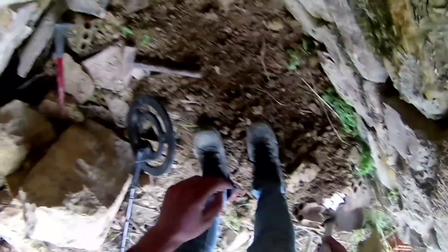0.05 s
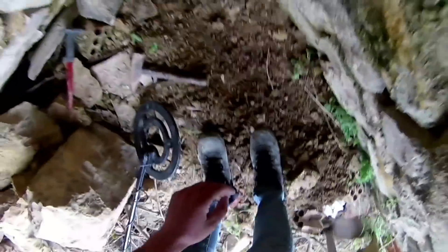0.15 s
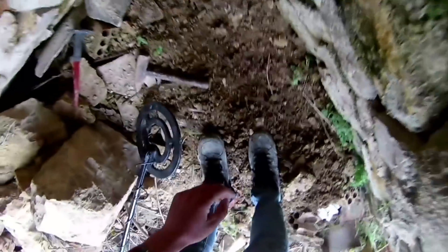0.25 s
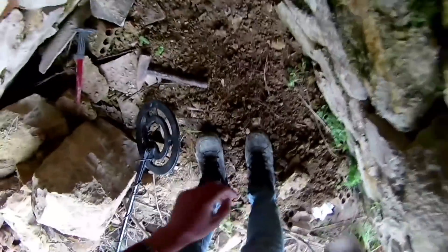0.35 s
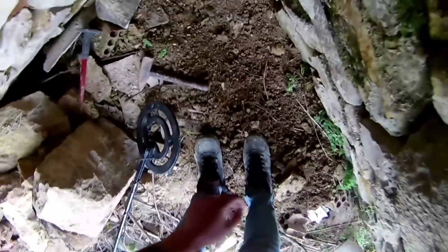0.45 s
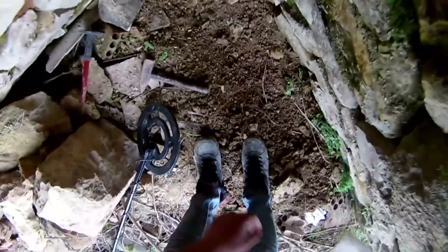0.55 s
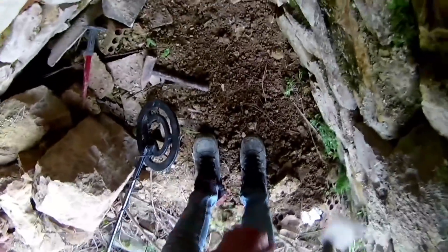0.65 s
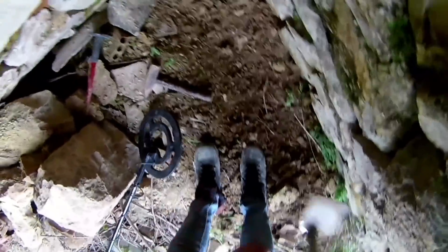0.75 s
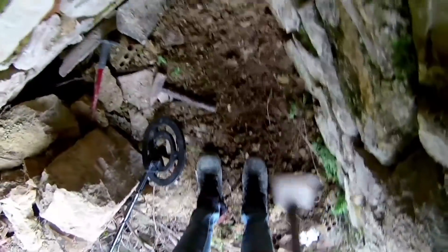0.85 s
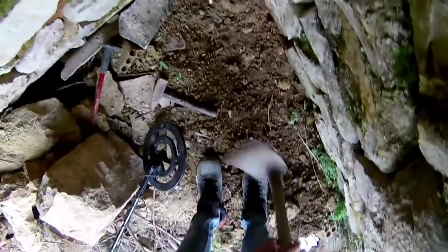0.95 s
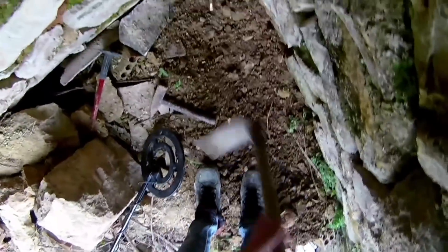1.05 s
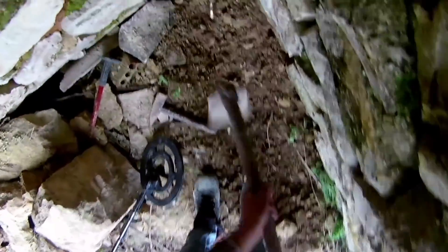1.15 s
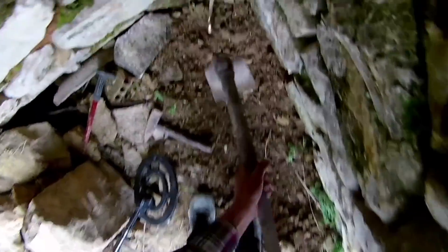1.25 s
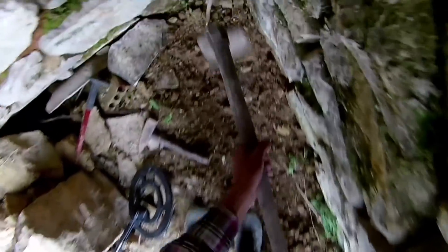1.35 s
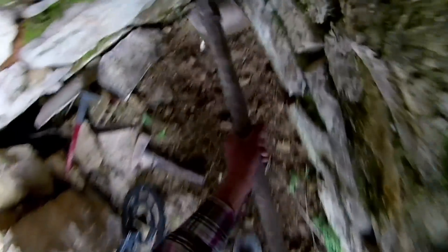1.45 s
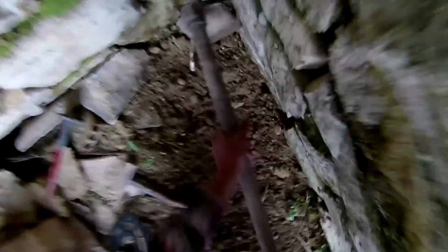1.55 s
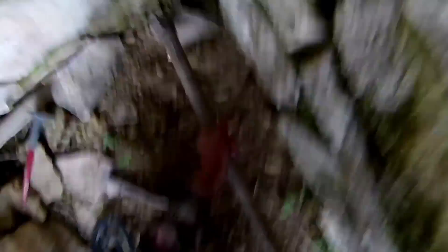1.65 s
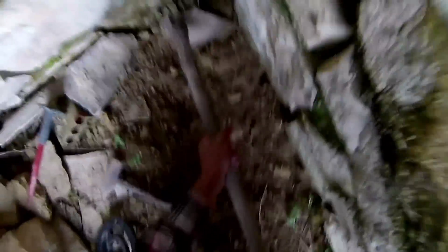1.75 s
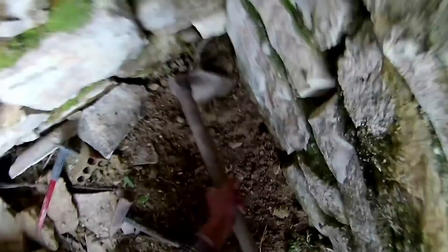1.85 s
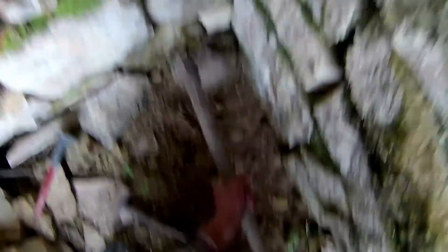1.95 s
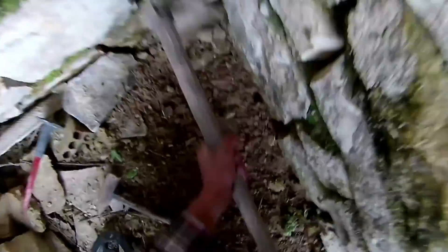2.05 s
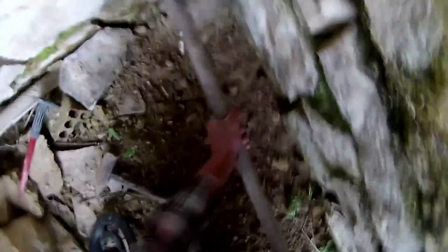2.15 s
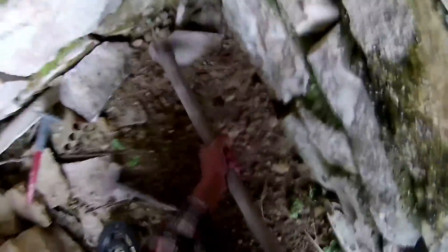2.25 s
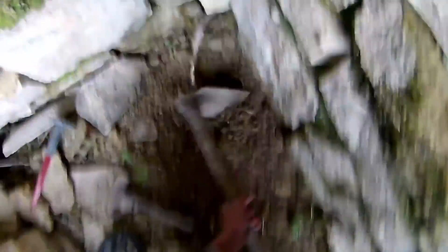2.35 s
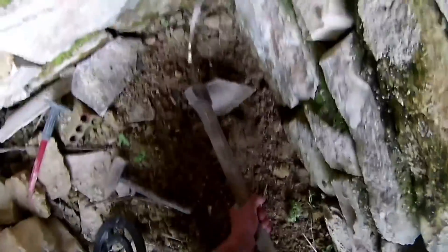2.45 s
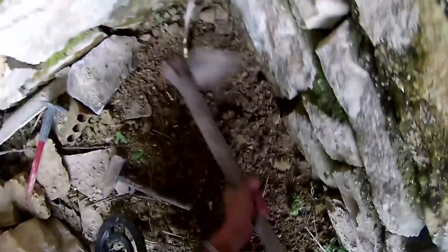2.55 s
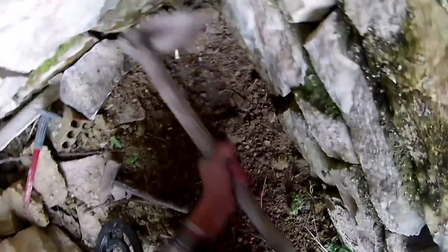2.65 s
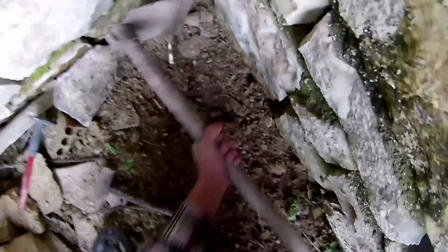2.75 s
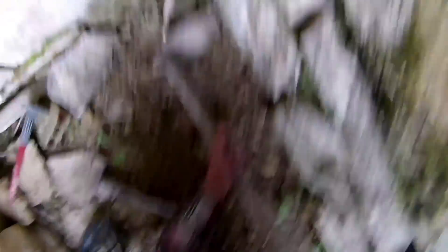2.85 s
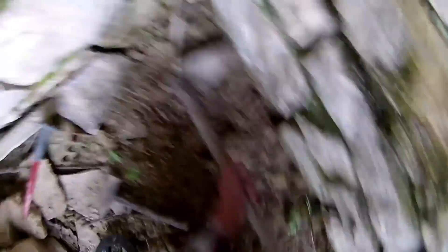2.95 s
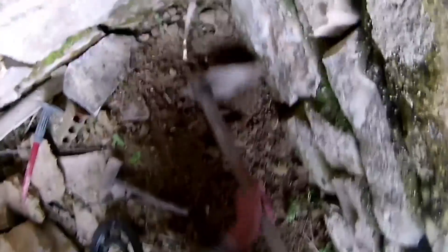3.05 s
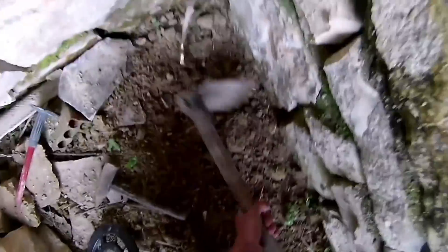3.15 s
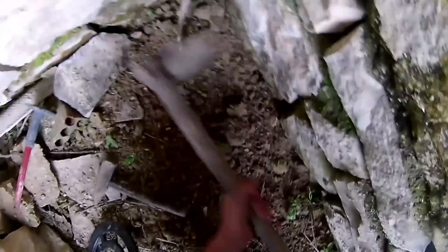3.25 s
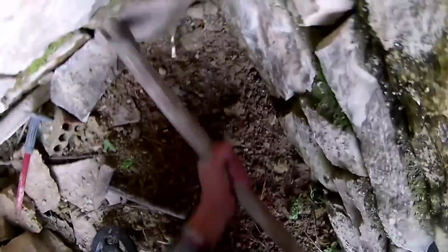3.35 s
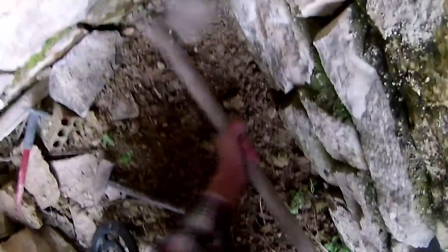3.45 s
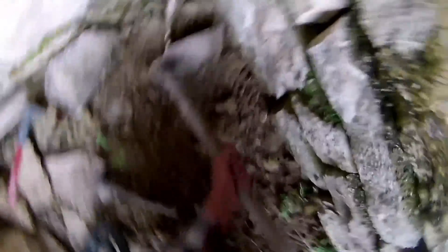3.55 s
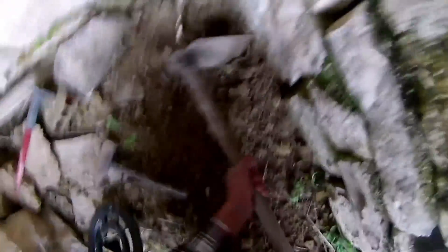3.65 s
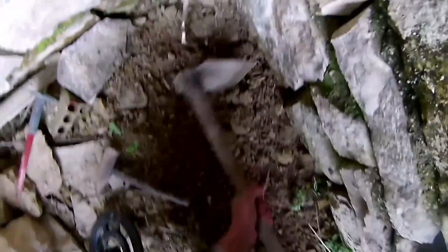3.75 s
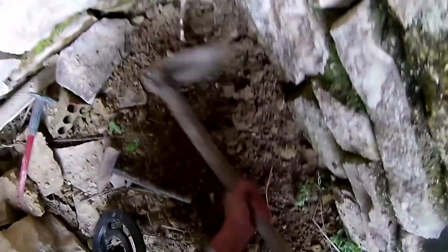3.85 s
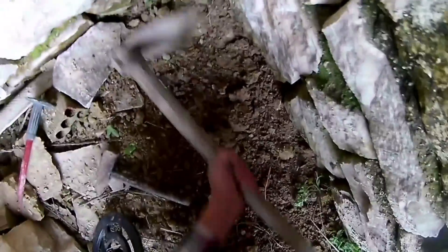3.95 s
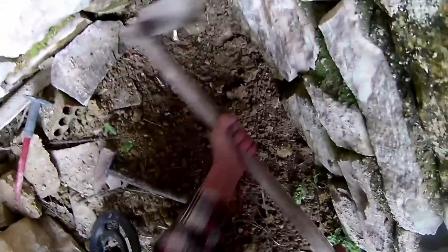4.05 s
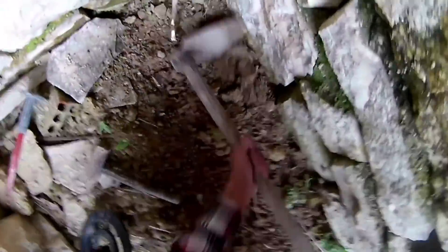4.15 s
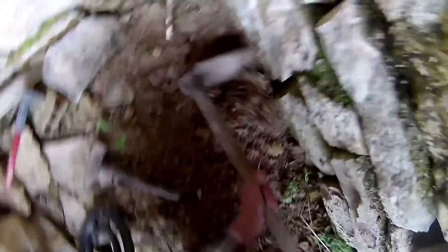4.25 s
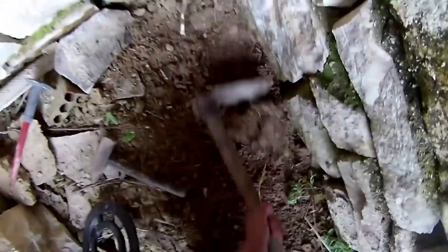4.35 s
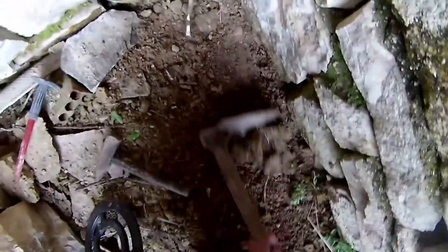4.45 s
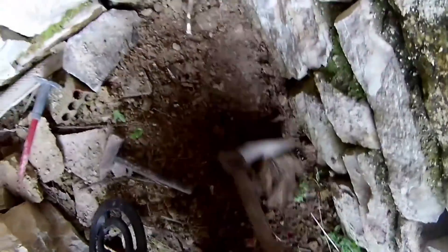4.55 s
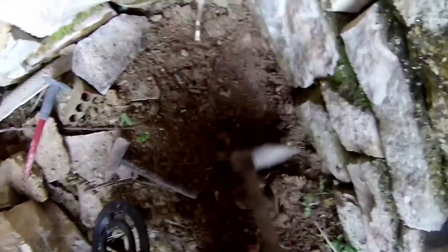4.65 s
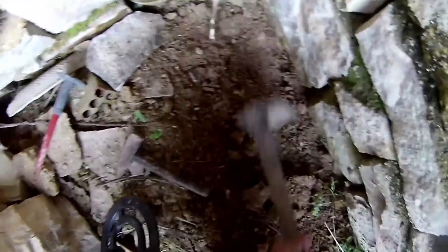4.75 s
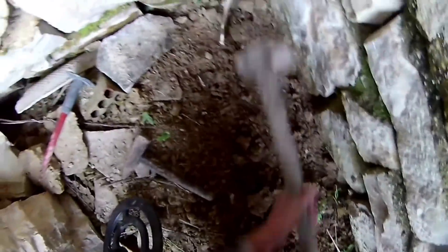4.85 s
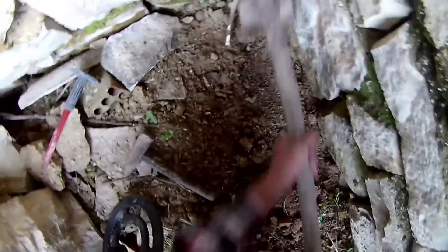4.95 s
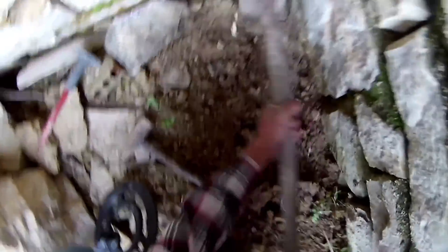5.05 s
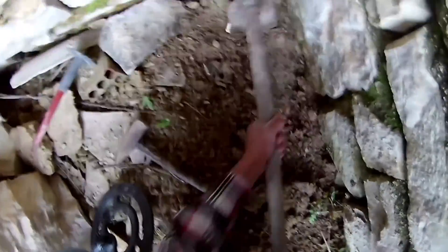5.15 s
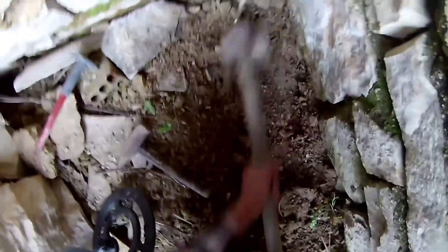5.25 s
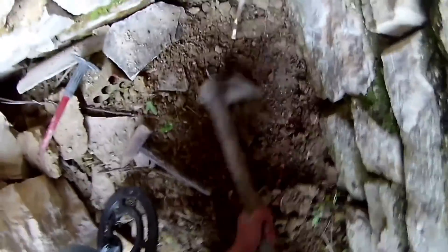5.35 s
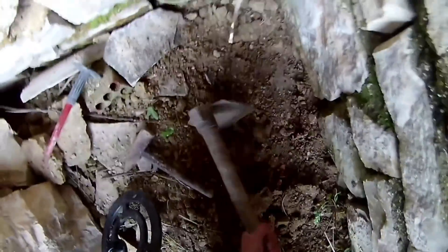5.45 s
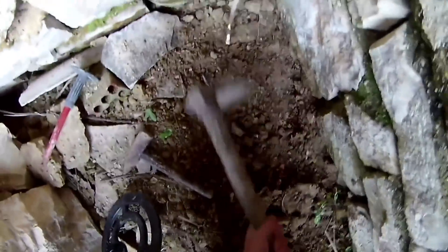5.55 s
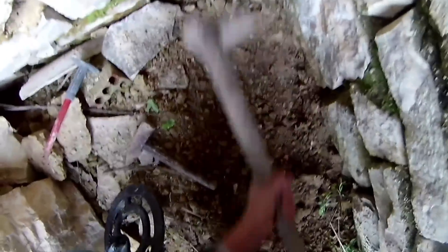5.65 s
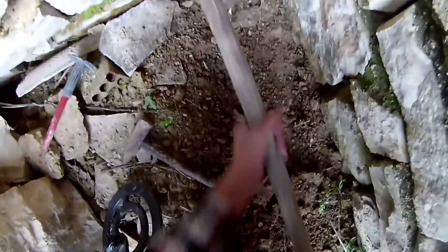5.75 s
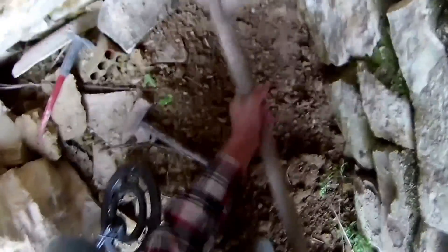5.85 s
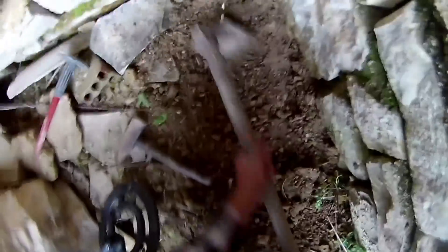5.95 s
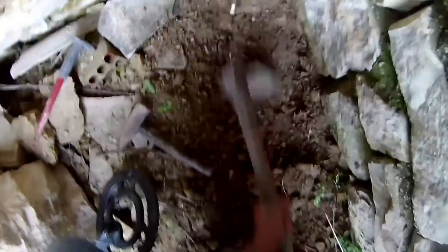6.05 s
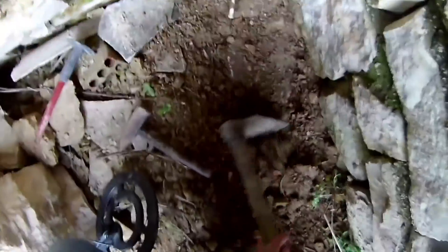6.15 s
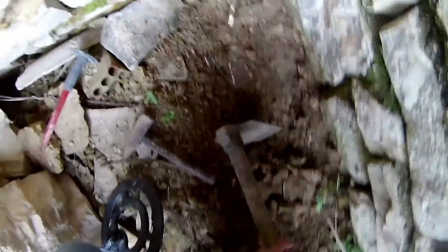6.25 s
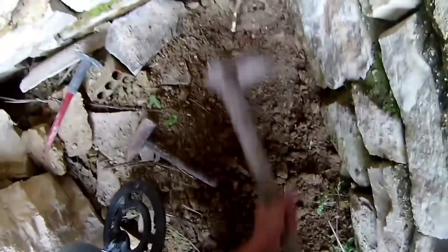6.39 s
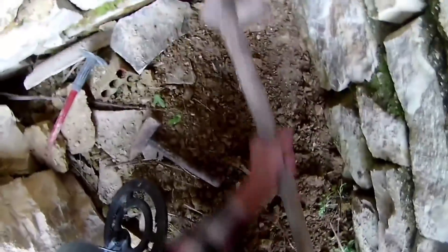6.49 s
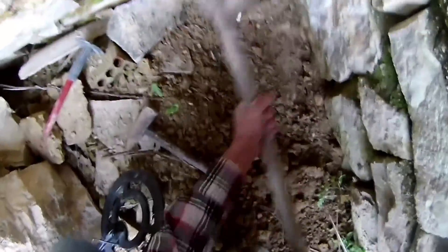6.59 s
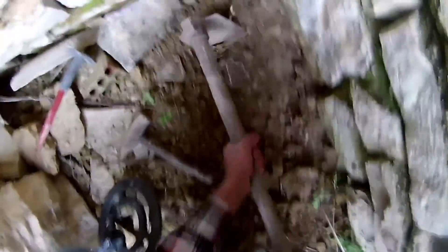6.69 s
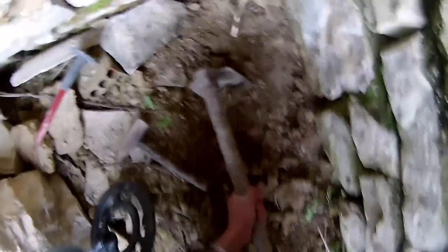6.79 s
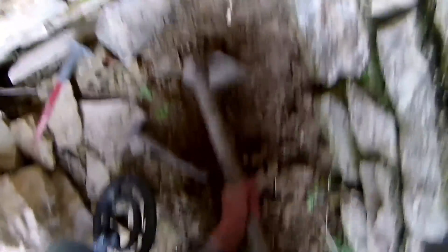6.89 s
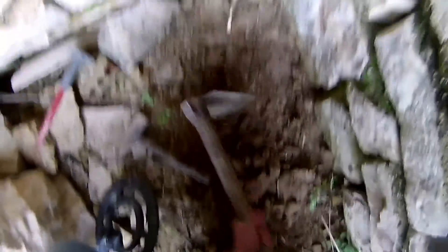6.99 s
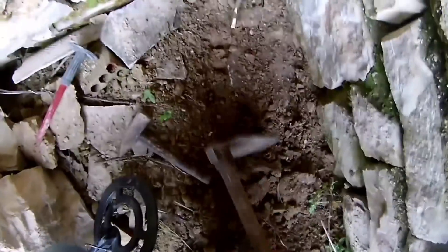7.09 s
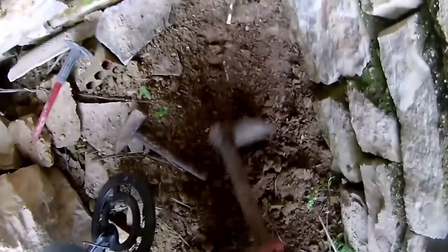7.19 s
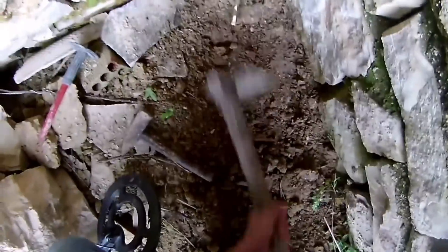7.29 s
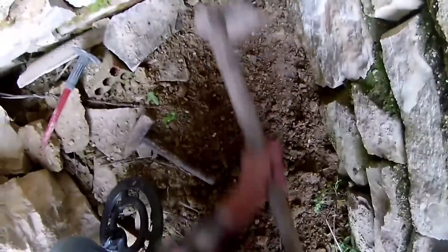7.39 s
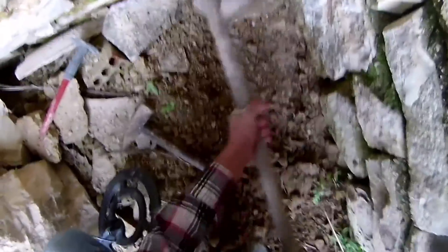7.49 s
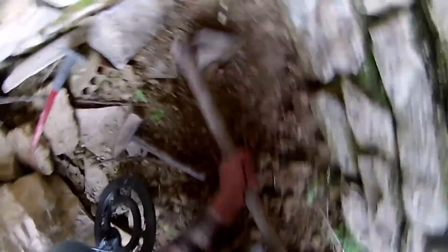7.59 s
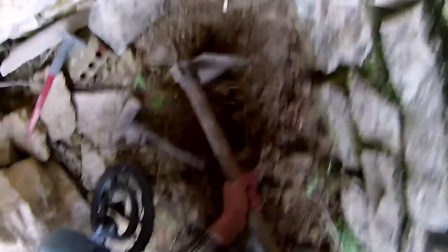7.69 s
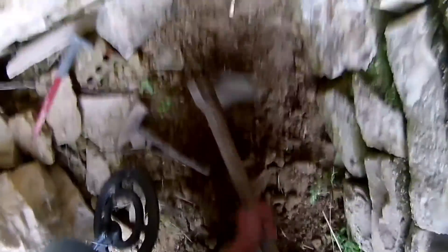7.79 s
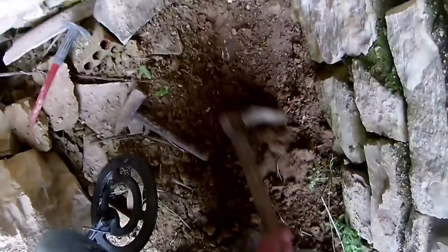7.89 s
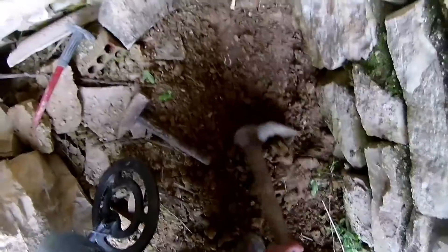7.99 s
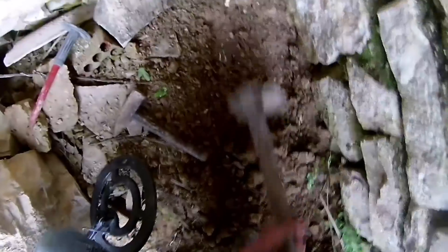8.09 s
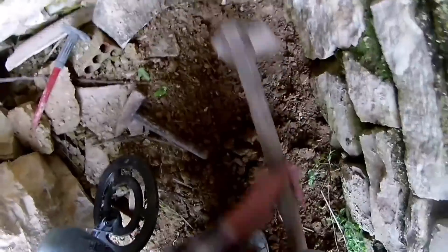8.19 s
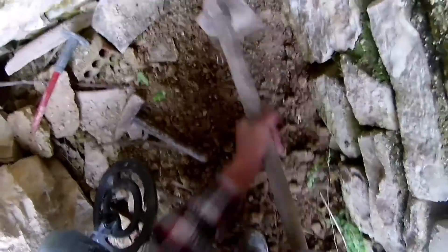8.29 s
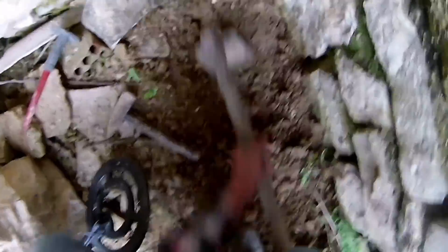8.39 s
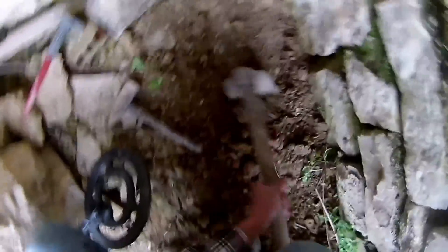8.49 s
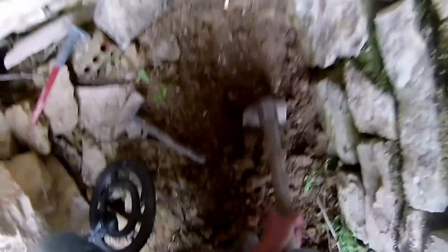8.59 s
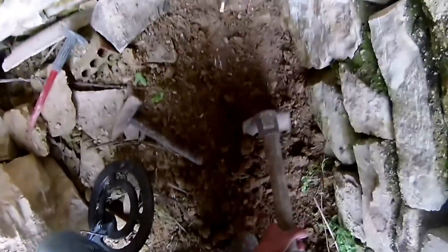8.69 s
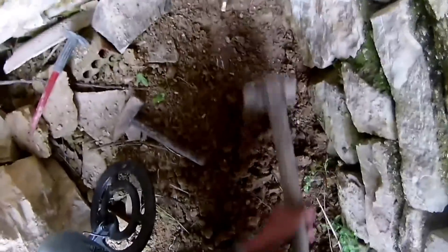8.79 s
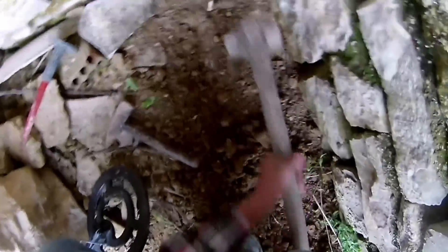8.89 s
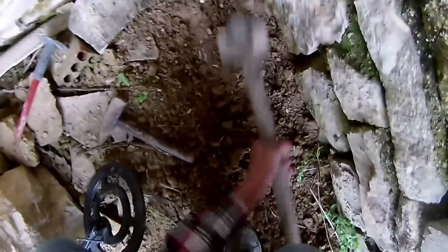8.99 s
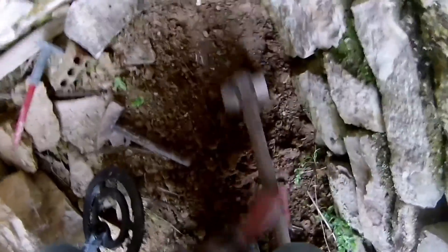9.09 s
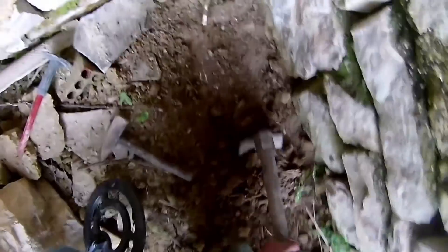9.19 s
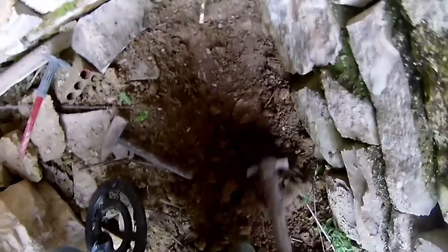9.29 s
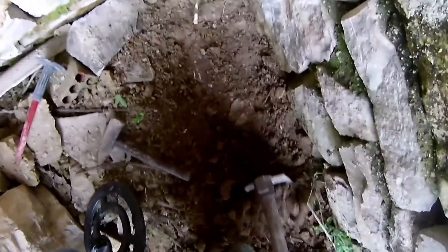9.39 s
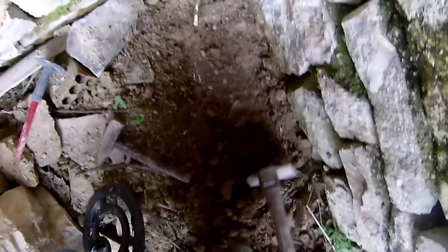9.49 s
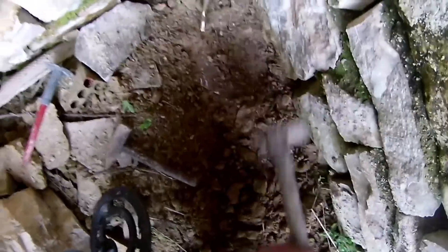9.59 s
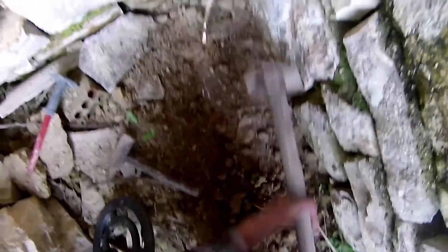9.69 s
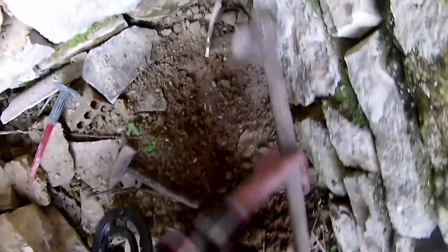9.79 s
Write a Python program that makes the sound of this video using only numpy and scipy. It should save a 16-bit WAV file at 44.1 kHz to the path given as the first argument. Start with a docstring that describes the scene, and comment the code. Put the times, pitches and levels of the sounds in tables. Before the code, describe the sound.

Faint handling ticks and a hollow knock lead into heavy, irregular digging. A steel pick cracks against buried stones and packed earth, sometimes in quick clusters of crunching impacts, then drags briefly through rubble while thrown soil drops back. Soft sleeve rub and quiet open air with thin hiss lie beneath. Nearby stones scatter a short, rough reflection; the close head-worn microphone overloads on the strongest blows.

```python
"""At the foot of a dry stone wall, a hand pick digs stony earth close to a small head-worn microphone.
Each blow is a crush of fractures clacking on stone, a handle knock, a ground thud, spat grit and ringing steel.
Between blows, bursts of breaking grains drag along the blade, and thrown soil and loose crumbs fall back.
One hollow knock comes early; quiet air, sleeve rub and hiss lie beneath, and the walls answer the digging.
The sound is nearly mono, and the hardest blows overload the microphone."""
import sys
import numpy as np
from scipy import signal
from scipy.io import wavfile
from scipy.ndimage import uniform_filter1d

SR = 44100
rng = np.random.default_rng(int(sys.argv[2]) if len(sys.argv) > 2 else 0)


def master_out(mix):
    """Clip the mix to full scale and print it as 16-bit PCM to the path in sys.argv[1]."""
    frames = np.transpose(np.atleast_2d(mix))
    ceiling = np.clip(frames, -1, 1)
    pcm = np.round(ceiling * 32767).astype(np.int16)
    wavfile.write(sys.argv[1], SR, pcm)


N = 433503  # length in samples
T = np.arange(SR // 3) / SR  # seconds since a contact


def amp(db):
    """Decibels to gain."""
    return 10 ** (np.asarray(db) / 20)


def evened(x):
    """Scales to rms 1."""
    return x / np.sqrt(np.mean(x ** 2) + 1e-20)


def sized(x):
    """Scales a short sound to the energy of 10 ms at rms 1."""
    return x / np.sqrt(np.sum(x ** 2) / (SR / 100) + 1e-20)


def read(points, hz):
    """Reads a table on a log-frequency axis."""
    table_hz, value = np.transpose(points)
    return np.interp(np.log(hz + 1), np.log(table_hz + 1), value)


def add(mix, s, sound):
    """Mixes a sound in at time s."""
    part = mix[max(round(s * SR), 0):][:len(sound)]
    part += sound[:len(part)]


def causal(points, size=2 * len(T)):
    """The minimum-phase impulse response of a spectrum: its energy comes as early as it can."""
    hz = abs(np.fft.fftfreq(size, 1 / SR))
    log_gain = np.log(amp(read(points, hz)))
    spectrum = np.exp(np.conj(signal.hilbert(log_gain)))
    return np.fft.ifft(spectrum).real[:size // 2]


def through(x, response):
    """Passes x through a body with this impulse response."""
    return signal.fftconvolve(x, response)[:len(x)]


def fading(t, t60):
    """Exponential decay that falls 60 dB in t60 seconds."""
    return np.exp(-np.log(1000) * t / t60)


def dying(t60, rise):
    """Envelope of a contact: a quick rise, then exponential decay."""
    return (1 - np.exp(-T / rise)) * fading(T, t60)


def mode(hz, t60, rise):
    """One dying vibration, scaled like any short sound."""
    return sized(dying(t60, rise) * np.sin(2 * np.pi * hz * T))


def crumbs(count, per_s, spread_db):
    """Tiny fractures at random moments, of random sign and uneven size."""
    size = amp(spread_db * np.minimum(rng.exponential(1, count), 4))
    breaks = rng.random(count) < per_s / SR
    return rng.choice([-1, 1], count) * size * breaks


def hiss(points):
    """Steady noise of a given colour at rms 1."""
    return evened(through(rng.standard_normal(N), causal(points)))


# Colour of the open air around the wall. Each row: frequency in Hz, level in dB.
AIR_COLOUR = [(12, -34), (20, -2), (81, -3), (137, -18), (196, -14.5), (232, -23.5), (267, -16.5),
              (453, -27), (521, -19.5), (651, -23.5), (1070, -24), (2930, -40), (15600, -52)]
AIR_DB = -50.5


def air():
    """Quiet open air, cloth rubbing softly with each swing of the arm, and a thin high hiss."""
    cloth = hiss([(100, -12), (350, 8), (1300, -1.0), (2200, -15.0), (4500, -22.5), (8000, -32.5)])
    high_hiss = hiss([(9000, -18), (15500, 3)])
    return amp(AIR_DB) * hiss(AIR_COLOUR) + sleeve() * cloth + amp(-73.0) * high_hiss


# the sleeve rubs as the arm is raised before a swing, and again as it comes down
LIFT_LEAD_S, LIFT_HALF_S, LIFT_DB = 0.61, 0.083, -64.5
DROP_LEAD_S, DROP_HALF_S, DROP_DB = 0.032, 0.056, -59


def sleeve():
    """How strongly the cloth rubs: once on the way up and once on the way down of each swing."""
    t = np.arange(N) / SR
    level = np.zeros(N)
    for swing in swings():
        for lead, half, db in [(LIFT_LEAD_S, LIFT_HALF_S, LIFT_DB), (DROP_LEAD_S, DROP_HALF_S, DROP_DB)]:
            level += amp(db) * np.exp(-((t - swing[0, 0] + lead) / half) ** 2)
    return level


PAUSE_S = .2  # a longer gap from one blow to the next separates two swings


def swings():
    """Groups the blows into swings of the arm."""
    rows = np.array(BLOWS)
    return np.split(rows, np.flatnonzero(np.diff(rows[:, 0]) > PAUSE_S) + 1)


# Modes of the steel head. Each row: frequency in Hz, level in dB when struck at the point,
# level in dB when struck at the blade, t60 in s when nothing else damps it.
STEEL_MODES = [(520, 3, 1, 0.22), (760, 1.5, -8, 0.12), (1595, 7, -6.5, 0.15), (2650, -11.5, -9.5, .07),
               (3090, 1.5, -14, .06), (3625, 1, -26.5, 0.31), (3940, -19.5, 3, 0.14),
               (4506, 0, -10.5, .085), (5296, -8.5, -7, 0.17), (6220, -21, -10.5, 0.11),
               (6460, -10.5, -20.5, 0.059), (9130, -17, -12, 0.19), (10700, -18.5, -16.5, .08)]


def steel(place):
    """Ring of the head; where it is struck (0 = point, 1 = blade) decides which modes speak."""
    ring = np.zeros(len(T))
    for hz, point_db, blade_db, t60 in STEEL_MODES:
        level = amp(point_db + place * (blade_db - point_db))
        ring += level * fading(T, t60) * np.sin(2 * np.pi * hz * T)
    return ring


def choked(ring):
    """With soil pressing on the head only its high modes speak, and briefly."""
    high_pass = signal.firwin(101, 2300, pass_zero=False, fs=SR)
    return through(ring * dying(t60=.018, rise=.0001), high_pass)


def pebble(count=6):
    """Every stone has a few short modes of its own."""
    pitches, signs = rng.random(count), rng.choice([-1, 1], count)
    return sum(sign * mode(hz=650 * 3 ** pitch, t60=0.034, rise=0.00078)
               for pitch, sign in zip(pitches, signs))


HARD_DB = -8.5  # blows with a louder clack bounce and land again
BOUNCE_S, BOUNCE_CLACK_DB, BOUNCE_BODY_DB = .019, -17, -5  # the second landing is soon, dull and weaker
# each drag catches one small stone: its pitch range, and its sound relative to the drag
CATCH_LOW_HZ, CATCH_HIGH_HZ, CATCH_DB, CATCH_KNOCK_DB, CATCH_RING_DB = 700, 1600, 3, -7, -25


def contacts():
    """All meetings of steel and stone: blows, bounces of the hard ones, and stones caught in a drag."""
    gaps = np.diff([row[0] for row in BLOWS], append=N / SR)
    bounces = []
    for (s, clack, hz, knock, thud, grit, ring), gap in zip(BLOWS, gaps):
        if clack > HARD_DB and gap > BOUNCE_S:
            bounces.append((s + BOUNCE_S, clack + BOUNCE_CLACK_DB, hz, knock + BOUNCE_BODY_DB,
                            thud + BOUNCE_BODY_DB, grit + BOUNCE_CLACK_DB, ring + BOUNCE_BODY_DB))
    caught = []
    for (s, half, rub, push), (when, pitch) in zip(DRAGS, rng.random((len(DRAGS), 2))):
        hz = CATCH_LOW_HZ * (CATCH_HIGH_HZ / CATCH_LOW_HZ) ** pitch
        caught.append((s + half * (when - 1), rub + CATCH_DB, hz, rub + CATCH_KNOCK_DB,
                       push + CATCH_DB, rub + DRAG_GRIT_DB, rub + CATCH_RING_DB))
    return BLOWS + caught + bounces


# Blows of steel on stone, before walls and microphone. Each row: start in seconds, clack level in dB,
# pitch of the clack in Hz, then levels in dB of the handle knock, ground thud, grit and ring of the pick.
BLOWS = [(0.15, -34.5, 1510, -47, -56, -62, -49.5), (0.2, -31, 1620, -40.5, -50, -44, -34.5),
         (0.419, -36, 795, -30.5, -52, -63, -60), (0.691, -23.5, 803, -42, -54, -35, -42.5),
         (1.55, -22.5, 800, -26, -33, -39.5, -39), (1.588, -14.5, 1622, -24.5, -33.5, -32.5, -45),
         (2.191, -6, 1580, -13, -14.5, -10.5, -49.5), (2.206, -21.5, 794, -7, -30, -35, -48.5),
         (2.288, -20, 677, -22.5, -24, -37.5, -53), (2.314, -13.5, 1630, -18.5, -13.5, -31.5, -58),
         (2.329, -13.5, 1604, -20, -12, -23.5, -53.5), (2.345, -15.5, 1800, -18, -15.5, -30, -52),
         (2.364, -15.5, 1274, -18, -18, -31, -52), (2.4, -20.5, 1300, -20, -17.5, -36.5, -46.5),
         (2.846, 3, 1541, -13, -20, -12.5, -51), (3.077, -35, 864, -36, -27.5, -45.5, -48.5),
         (3.486, -3, 1472, -12.5, -20, -15, -51.5), (4.14, -5, 877, -8.5, -13.5, -18.5, -44),
         (4.203, -4, 1101, -15, -17, -25, -41.5), (4.231, -12.5, 1555, -20, -18.5, -29.5, -61.5),
         (4.249, -15.5, 645, -15.5, -31, -37, -65.5), (4.341, -17, 706, -19.5, -65, -48, -73),
         (4.384, -26.5, 1080, -24.5, -47, -48, -56), (4.992, -15, 1600, -26, -42, -36, -40.5),
         (5.086, -30, 1810, -33, -24, -37.5, -45.5), (5.439, -29, 1497, -41, -47, -39, -46),
         (5.869, -22, 1725, -35.5, -26.5, -19.5, -63), (5.896, -23, 1880, -14, -16.5, -34, -66.5),
         (5.933, -18, 1460, -19.5, -21.5, -30, -51), (5.969, -12, 1680, -12, -18.5, -23, -49),
         (5.974, -2.5, 1490, -28, -15.5, -23, -59), (6.0, -8.5, 1650, -18, -28.5, -17.5, -42.5),
         (6.01, -7.5, 1564, -24, -29, -22, -44.5), (6.993, -20.5, 1488, -40, -31.5, -32, -42.5),
         (7.537, -10.5, 1576, -5, -17, -29, -62.5), (7.62, -8.5, 1100, -18, -17, -20.5, -55),
         (7.877, -19.5, 1394, -27, -33.5, -33, -71), (8.379, -11.5, 1207, -15.5, -15.5, -22.5, -42.5),
         (9.029, -3, 676, -15.5, -16.5, -18, -30.5), (9.082, -4, 1328, -28.5, -13, -27.5, -30),
         (9.749, -21, 1510, -36.5, -32, -27, -25.5), (9.764, -11.5, 1040, -34, -43.5, -20, -36)]
# How the pick is turned in the hand. Each row: time in seconds, turn (0 = point leads, 1 = flat blade leads).
TURN = [(2.4, 0.14), (4.3, 0.33), (5, 0.66), (5.5, .25), (7.6, 0.6), (8.4, 0.94), (9.1, 0.62), (9.7, 0)]
# Colours of the struck stone, the handle, the ground and the grit. Each row: frequency in Hz, level in dB.
STONE_COLOUR = [(200, -34.5), (450, 1.5), (700, 2.5), (1100, -1.5), (1500, 5), (1850, -3), (2100, -9),
                (2800, -18.5), (5000, -48.5), (8000, -62)]
HANDLE_COLOUR = [(60, -20), (140, -5), (210, -5), (290, -2.5), (370, -10.5), (430, -0.5), (520, -3),
                 (700, -13.5), (1400, -34), (4000, -70)]
EARTH_COLOUR = [(25, -20), (60, -10.5), (90, -6), (115, 1.5), (160, -3), (220, -14), (300, -13),
                (500, -29.5), (2000, -62)]
GRIT_COLOUR = [(1000, -18), (2000, -3.5), (2500, 3.5), (4400, -2), (4900, -12.5), (6800, -10), (9000, -10),
               (12500, -13.5)]
KNOCK_FREE_HZ, KNOCK_BURIED_HZ = 515, 265  # the handle knocks lower as the head sinks into the earth
FREE_DB, BURIED_DB = -13.5, -4  # thud over clack with the head free, and with it buried


def blows(stone, handle, earth, grit):
    """The steel cuts through loose soil, meets a stone and crushes its way in for some milliseconds."""
    out = np.zeros(N)
    entry = np.exp(-np.arange(SR // 100)[::-1] / SR / .0018)  # swells until the stone is met
    landings = np.array([row[0] for row in BLOWS] + [np.inf])
    for s, clack_db, clack_hz, knock_db, thud_db, grit_db, ring_db in contacts():
        gap = landings[landings > s][0] - s
        place = np.clip(np.interp(s, *np.transpose(TURN)), 0, 1)
        pick = steel(place)

        crush_envelope = dying(t60=0.028, rise=0.0011) + amp(-27.0) * dying(t60=0.19, rise=.004)
        crush = crumbs(len(T), per_s=7500, spread_db=4.0) * crush_envelope
        clack_tone = mode(clack_hz, t60=0.032, rise=0.0036)
        clack = sized(sized(through(crush, stone)) + amp(1.0) * clack_tone + amp(-3) * sized(pebble()))

        shake = rng.standard_normal(len(T)) * dying(t60=0.075, rise=0.00033)
        knock_hz = np.interp(thud_db - clack_db, [FREE_DB, BURIED_DB], [KNOCK_FREE_HZ, KNOCK_BURIED_HZ])
        # a low knock rings longer: it dies after a set number of cycles
        knock_tone = mode(knock_hz, t60=23 / knock_hz, rise=0.0009)
        knock = sized(sized(through(shake, handle)) + amp(0.5) * knock_tone)

        settle = rng.standard_normal(len(T)) * dying(t60=0.066, rise=0.0029)
        thud_tone = mode(hz=114 + 12 * rng.standard_normal(), t60=.09, rise=0.001)
        thud = sized(sized(through(settle, earth)) + amp(-2.5) * thud_tone)

        # grit breaks against the head, whose ring is choked while it is buried
        spray_envelope = dying(t60=0.014, rise=.001) + amp(-11.5) * dying(t60=0.074, rise=0.012)
        spray = crumbs(len(T), per_s=4300, spread_db=-2.0) * spray_envelope
        crunch = sized(sized(through(spray, grit)) + amp(-0.5) * sized(through(spray, choked(pick))))

        # the ring is damped by the next blow and by soil on the blade
        damping = np.exp(-np.maximum(T - gap, 0) / 0.027 - place * T / 0.1)
        ring = np.sqrt(2) * pick * (1 - np.exp(-T / 0.0033)) * damping

        body = amp(knock_db) * knock + amp(thud_db) * thud
        add(out, s, amp(clack_db) * clack + body + amp(grit_db) * crunch + amp(ring_db) * ring)

        soil = entry * rng.standard_normal(len(entry))
        cut = amp(clack_db) * sized(through(soil, stone)) + amp(grit_db) * sized(through(soil, grit))
        add(out, s - len(entry) / SR, amp(-22) * cut)
    return out


# Drags of the blade through rubble, before walls and microphone. Each row: middle in seconds,
# half length in seconds, level of the rubbing in dB, level of the pushed earth in dB.
DRAGS = [(0.2, 0.048, -35, -50.5), (0.395, 0.014, -37, -47.5), (0.601, 0.13, -53.5, -64.5),
         (1.631, 0.012, -29, -23), (1.841, 0.016, -51, -53), (2.256, 0.015, -32, -23),
         (3.098, 0.024, -44.5, -39.5), (4.184, 0.012, -23, -22), (4.289, 0.026, -32, -25),
         (4.599, 0.02, -52, -66), (5.273, 0.028, -28.5, -32), (5.328, 0.042, -29, -29),
         (6.048, 0.01, -29.5, -36.5), (6.114, 0.023, -28.5, -44), (6.244, 0.007, -39, -44),
         (6.627, 0.016, -33.5, -35), (6.765, 0.016, -32.5, -47.5), (7.03, 0.066, -41.5, -48.5),
         (8.48, 0.017, -23.5, -34.5), (8.533, 0.0065, -35.5, -46.5), (9.132, 0.018, -30.5, -43.5),
         (9.251, 0.05, -48.5, -60)]
DRAG_GRIT_DB = -12.5  # grit of a drag, relative to its rubbing
FAINT_DB, FIRM_DB, FAINT_PER_S, FIRM_PER_S = -52, -34, 270, 3000  # a firmer drag breaks more grains a second


def scrapes(stone, earth, grit):
    """Grains catch and break along the blade, in clumps, while the earth is pushed aside."""
    out = np.zeros(N)
    blade = sized(choked(steel(0.76)))
    t = np.arange(-.15, .2, 1 / SR)  # seconds from the middle of the drag
    for s, half, rub_db, push_db in DRAGS + spills():
        stroke = np.exp(-(t / half) ** 2 / 2)
        clumps = amp(3.5 * evened(uniform_filter1d(rng.standard_normal(len(t)), size=260)))
        per_s = np.interp(rub_db, [FAINT_DB, FIRM_DB], [FAINT_PER_S, FIRM_PER_S])
        grains = crumbs(len(t), per_s, spread_db=7.5) * stroke * clumps
        rub = evened(through(grains, sized(stone) + amp(-3.0) * sized(pebble())))
        fizz = evened(through(grains, sized(grit) + blade))
        push = evened(through(rng.standard_normal(len(t)) * stroke, earth))
        sound = amp(rub_db) * rub + amp(push_db) * push + amp(rub_db + DRAG_GRIT_DB) * fizz
        # levels hold over the length of the drag
        add(out, s + t[0], sound * np.sqrt(2 * abs(half) * SR / len(t)))
    return out


SPILL_DELAY_S, SPILL_HALF_S = 0.099, .032  # thrown soil lands after the last blow of a swing
SPILL_DB, SPILL_SLOPE, SPILL_PUSH_DB = -45, 0.41, -6  # level after a 0 dB clack, dB per dB of clack, its bass


def spills():
    """Soil thrown up by each swing lands a moment later, like a faint drag."""
    rows = []
    for swing in swings():
        s, clack_db = swing[-1][:2]
        db = SPILL_DB + SPILL_SLOPE * clack_db
        rows.append((s + SPILL_DELAY_S, SPILL_HALF_S, db, db + SPILL_PUSH_DB))
    return rows


def trickle(stone, grit):
    """Loose crumbs keep dropping back into the hole after each blow."""
    loosened = np.zeros(N)
    for s, clack_db, *_ in BLOWS:
        add(loosened, s, amp(clack_db / 2) * np.exp(-np.arange(SR) / SR / 0.059))
    falls = crumbs(N, per_s=230, spread_db=-1.5) * loosened
    return amp(-64) * evened(through(falls, stone)) + amp(-68.0) * evened(through(falls, grit))


HOLLOW_S = .692  # one hollow knock as the pick is taken up
HOLLOW_HZ, HOLLOW_DB, HOLLOW_T60_S = 202.5, -26.5, 0.2


def hollow():
    """A single low, hollow knock: one dying vibration."""
    out = np.zeros(N)
    add(out, HOLLOW_S, amp(HOLLOW_DB) * mode(HOLLOW_HZ, HOLLOW_T60_S, rise=0.0038))
    return out


# Fading of the yard's tail. Each row: frequency in Hz, t60 in s.
YARD_DECAY = [(100, .5), (500, 0.88), (1500, 0.92), (3000, .45), (7000, 0.9)]


def walls(x):
    """Close stones scatter the sound at once; the yard's faint tail fades soonest near 3 kHz and in the low bass."""
    near = crumbs(len(T), per_s=2200, spread_db=1) * dying(t60=.05, rise=.002)
    hz, t, z = signal.stft(rng.standard_normal(SR), SR, nperseg=256)
    decay = fading(t, read(YARD_DECAY, hz)[:, None])
    tail = signal.istft(z * decay, SR, nperseg=256)[1]
    scatter = amp(-12) * through(x, near / np.linalg.norm(near))
    yard = amp(-41) * through(x, tail / np.linalg.norm(tail))
    return x + scatter + yard


# The head-worn microphone is thin in the deep bass and dull in the treble.
# Each row: frequency in Hz, response in dB.
MICROPHONE = [(25, -5), (60, -3.5), (100, -0.5), (6900, -1.5), (7400, -17), (8100, -20), (9200, -14.5),
              (11100, -18.5), (12000, -32)]


def scene():
    """All sources reach both channels alike; the microphone colours the digging and its echoes."""
    stone, handle, earth, grit = map(causal, (STONE_COLOUR, HANDLE_COLOUR, EARTH_COLOUR, GRIT_COLOUR))
    digging = blows(stone, handle, earth, grit) + scrapes(stone, earth, grit)
    digging = digging + trickle(stone, grit) + hollow()
    heard = through(walls(digging), causal(MICROPHONE))
    return np.tile(heard + air(), (2, 1))


EDGE_HZ = 15800  # upper band limit


def record(dry):
    """Each channel adds a trace of hiss; peaks are clipped flat; then the band limit."""
    noisy = dry + amp(-83.5) * rng.standard_normal(dry.shape)
    clipped = np.clip(noisy, -.98, .98)
    low_pass = signal.firwin(511, EDGE_HZ, window=("kaiser", 9), fs=SR)
    return signal.oaconvolve(clipped, low_pass[None], "same")


dry = scene()
out = record(dry)
master_out(out)
```